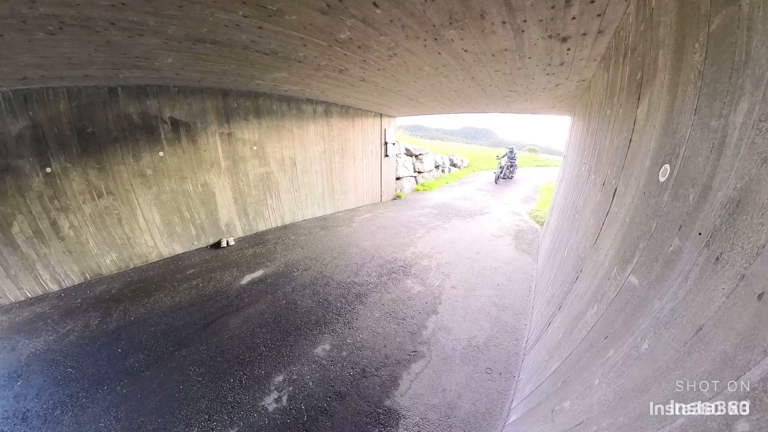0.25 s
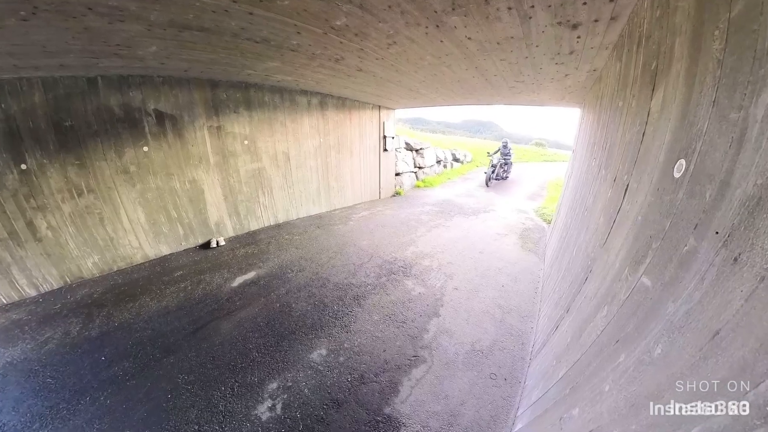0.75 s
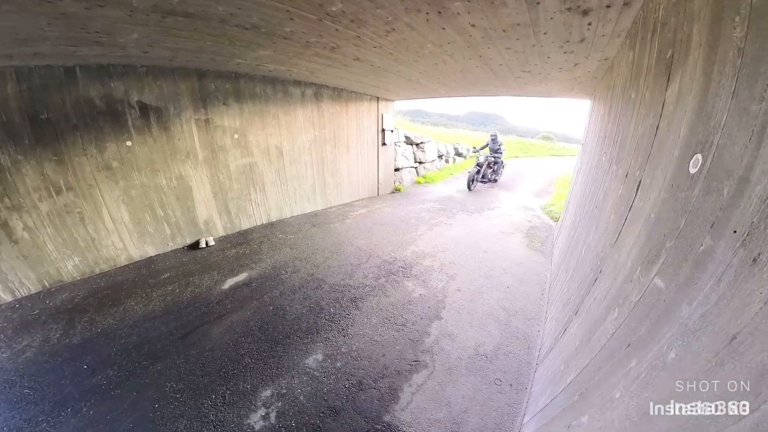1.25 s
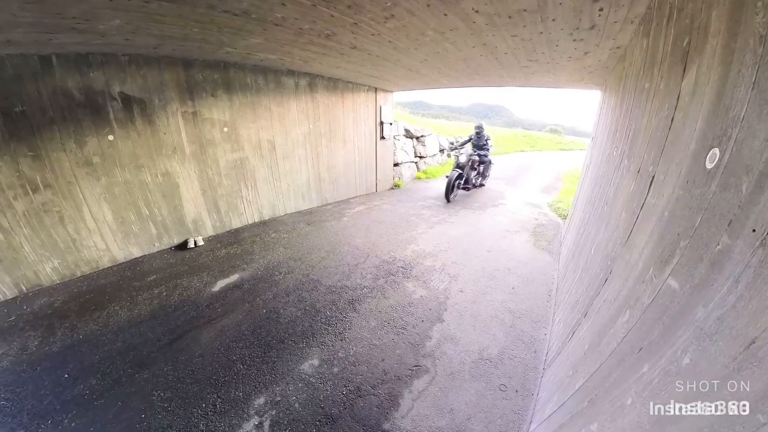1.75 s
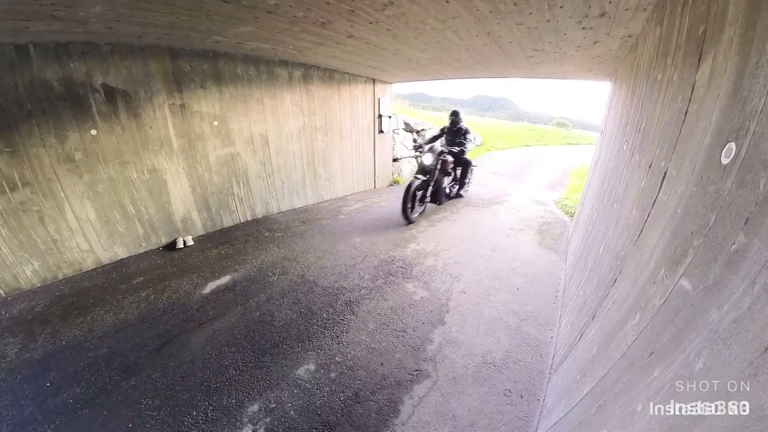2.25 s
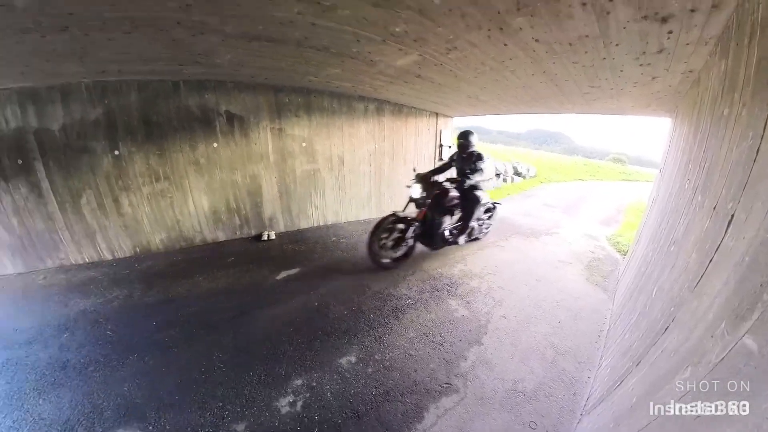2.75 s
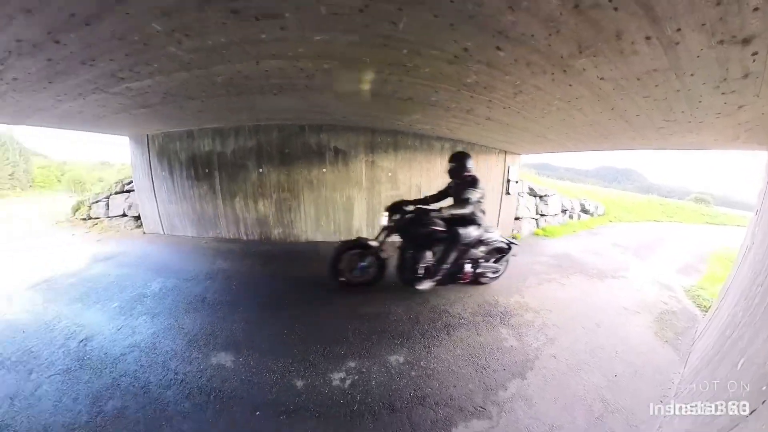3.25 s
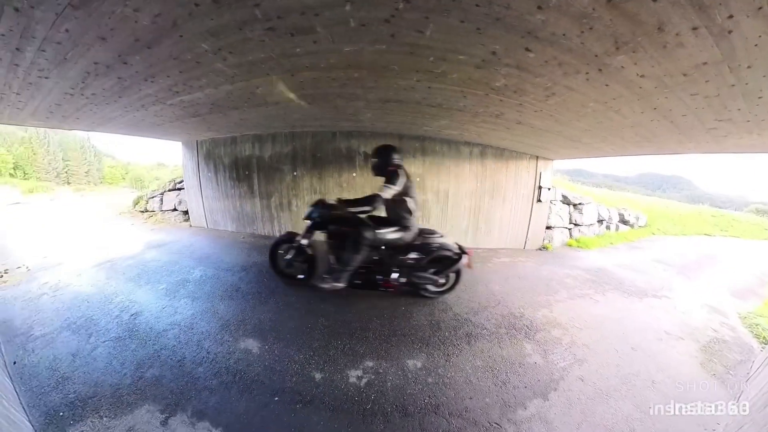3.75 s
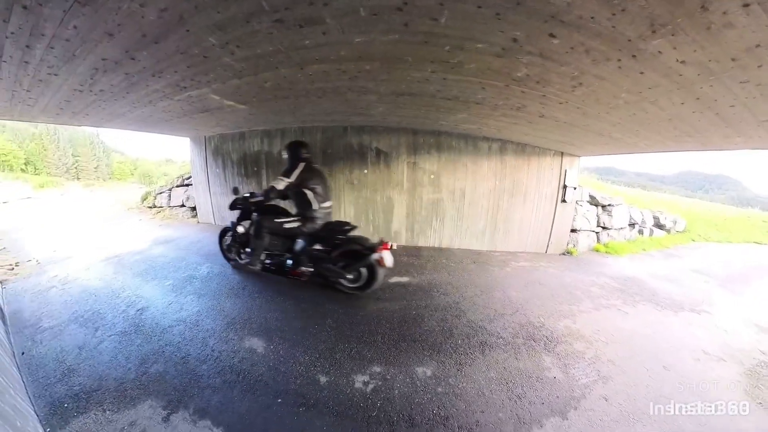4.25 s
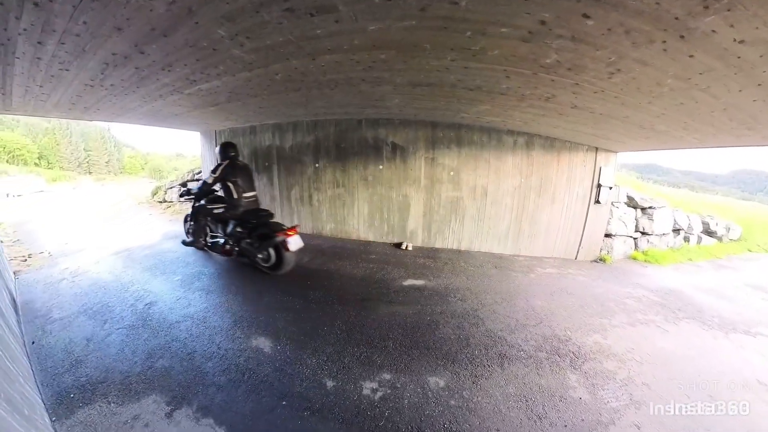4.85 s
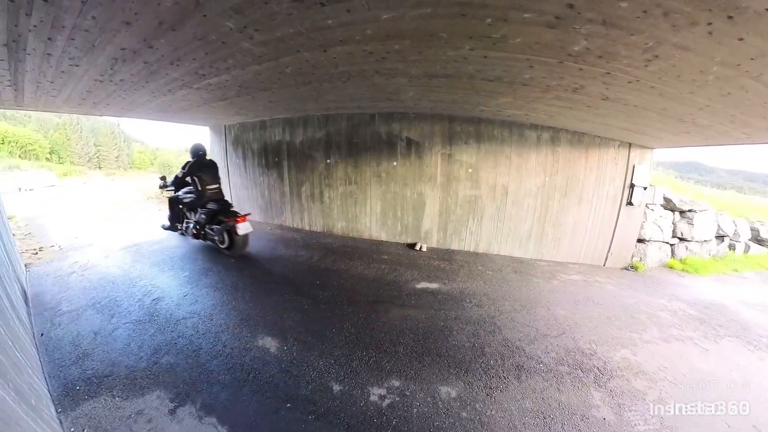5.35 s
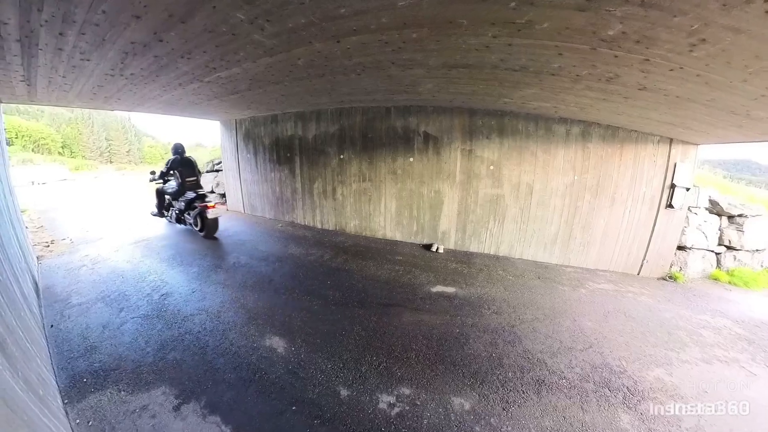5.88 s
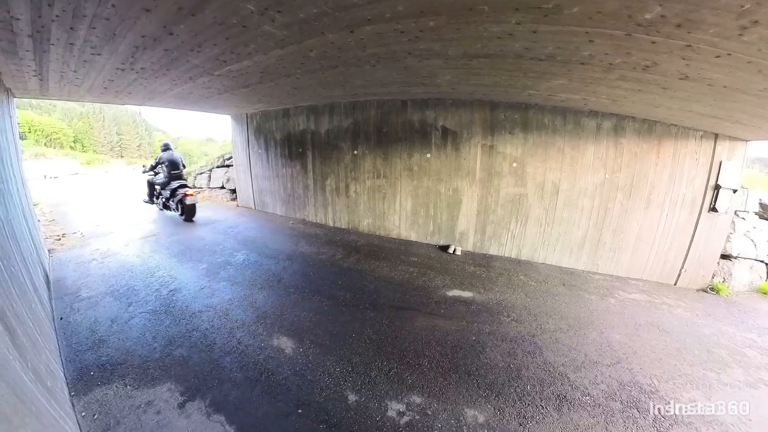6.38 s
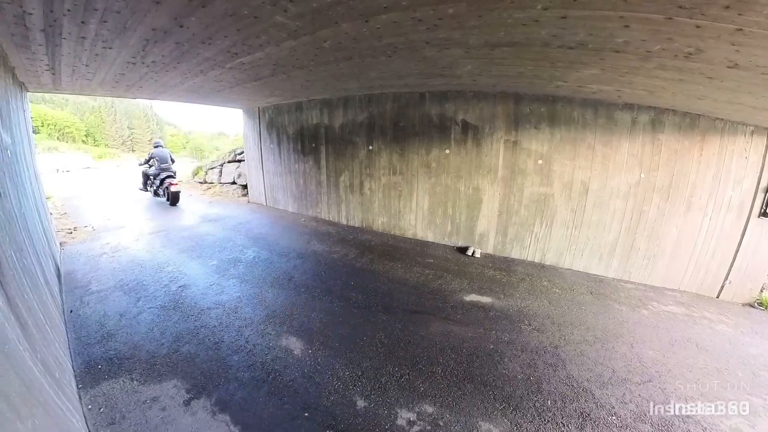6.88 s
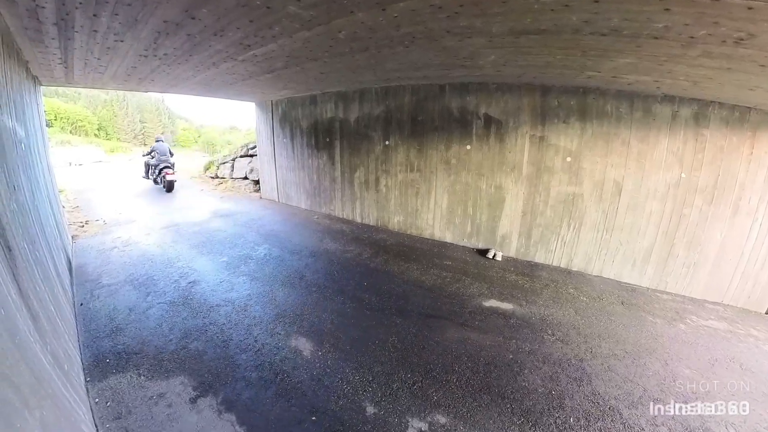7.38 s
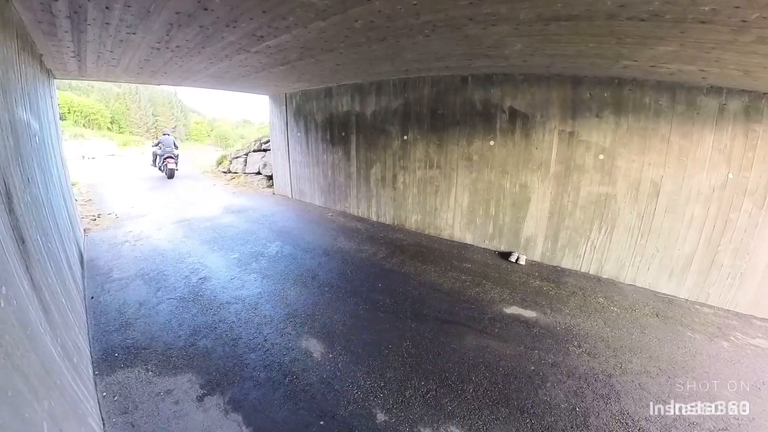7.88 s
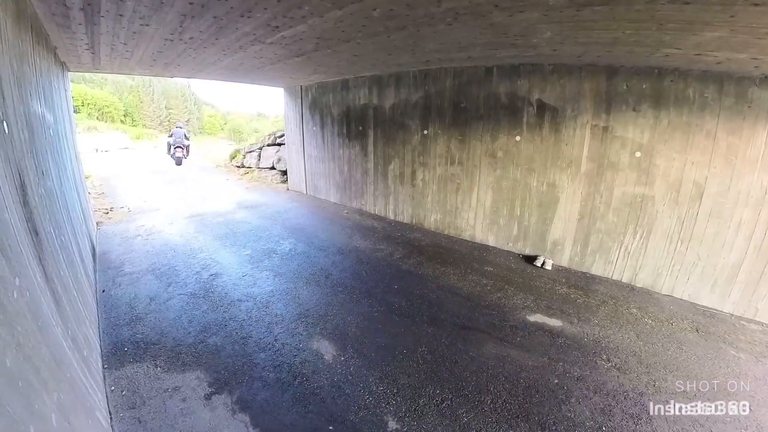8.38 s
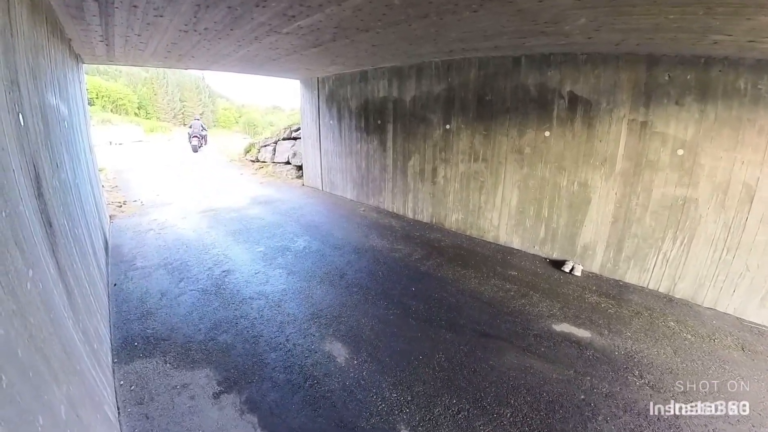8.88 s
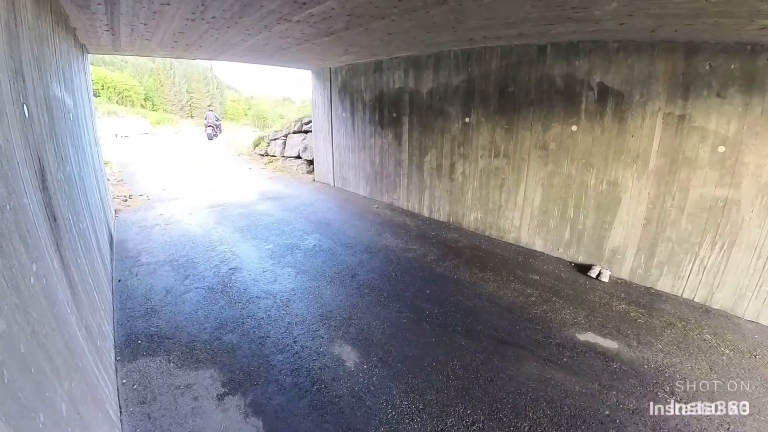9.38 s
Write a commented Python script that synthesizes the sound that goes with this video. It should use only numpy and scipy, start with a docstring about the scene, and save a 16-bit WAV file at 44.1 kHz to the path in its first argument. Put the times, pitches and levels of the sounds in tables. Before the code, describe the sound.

Deep, uneven motorcycle exhaust throbs and echoes in a concrete underpass as the bike rolls past, revs briefly and leaves.

```python
"""A big V-twin motorcycle booms slowly through a concrete underpass, blips the throttle and leaves.
Two uneven firings a cycle drive the pipe: four low booms, a bark and a growl. The motor rasps, ticks
and clanks; a gear whines on the approach; covers ring and rattle. Walls, roof and road smear the
sound and hold low standing waves. A quick gain control flattens the level."""
import sys
import numpy as np
from scipy import signal
from scipy.io import wavfile
from scipy.ndimage import uniform_filter1d

SR = 44100
rng = np.random.default_rng(int(sys.argv[2]) if len(sys.argv) > 2 else 0)


def int16_out(signal):
    """Quantize to a 16-bit WAV file."""
    q = np.round(np.clip(np.atleast_2d(signal).T, -1, 1) * 32767)
    wavfile.write(sys.argv[1], SR, q.astype(np.int16))


N = 424683
TIME_S = np.arange(N) / SR

# Engine speed, two crank turns a cycle: time_s, cycle_hz
ENGINE_SPEED = [(0.0, 11.79), (0.35, 11.74), (0.7, 11.94), (1.2, 11.73), (2.1, 11.0), (2.4, 11.34),
                (3.0, 11.08), (3.3, 11.98), (3.65, 11.61), (4.0, 10.24), (4.5, 8.81), (5.1, 9.16),
                (5.65, 8.87), (6.3, 16.87), (6.63, 14.87), (6.85, 16.14), (7.2, 14.49), (7.45, 14.95),
                (7.8, 11.29), (8.15, 10.95), (9.15, 10.61), (9.4, 11.9), (9.63, 12.2)]
# When the bike is heard from each of three sides: ahead_s, beside_s, behind_s
SIDE_TIMES = (3.0, 5.1, 7.6)

# Exhaust booms, trading places across the standing waves: time_s, 4 x level_db
BOOM_LEVELS = [(0.05, -23, -12.5, -15, -29), (0.69, -20, -13.5, -16.5, -33), (1.4, -15.5, -12, -14.5, -41),
               (2.15, -20.5, -14.5, -11, -25.5), (2.62, -17, -14, -16, -16.5), (2.76, -20, -22, -14, -14),
               (2.97, -21, -23.5, -9, -19), (3.58, -18, -11.5, -20, -18.5), (3.82, -33, -11, -19, -19),
               (4.27, -12.5, -17, -10, -21), (4.48, -22, -14.5, -19, -22.5), (4.59, -19, -20, -5, -19.5),
               (4.67, -20, -9.5, -22, -17), (4.96, -30, -14, -11.5, -23.5), (5.01, -31, -20, -19, -28),
               (5.07, -33, -15, -7, -32), (5.12, -28, -19, -15, -33), (5.2, -40, -21.5, -8, -26),
               (5.34, -34, -19, -7.5, -25), (5.46, -29, -15, -15.5, -24.5), (5.63, -29, -16, -9, -20.5),
               (5.7, -25, -12, -14, -25), (5.76, -22, -15.5, -10.5, -22.5), (5.84, -23, -14.5, -11, -24),
               (5.94, -27, -4, -15.5, -19.5), (5.99, -23, -13, -9, -21), (6.15, -19, -11.5, -15.5, -21),
               (6.79, -33, -11, -18.5, -18.5), (6.981, -27, -13.5, -15, -20.5),
               (8.07, -19, -11.5, -18.5, -22.5), (8.6, -20, -15, -15, -22.5),
               (9.13, -22, -17.5, -15.5, -20.5), (9.3, -19, -16, -17.5, -23.5),
               (9.53, -26, -10.5, -17, -20.5), (9.58, -24, -17, -19.5, -22)]
# Resonance width, a row per boom: ahead_hz, beside_hz, behind_hz
BOOM_WIDTHS = [(30, 30, 26), (33, 46, 23), (56, 54, 27), (80, 95, 48)]
# Pitch of the lowest boom: ahead_hz, beside_hz, behind_hz
LOWEST_BOOM = (56.6, 53.4, 64)
# Firing pattern, a row per boom: 3 sides x (first_cycles, gap_cycles, second_db)
BOOM_FIRINGS = [(.43, .43, -1, .44, .43, -1, .45, .43, 0), (-.07, .44, -4, .2, .44, -2, .45, .4, -4),
                (.1, .42, 0, 0, .445, 0, -.05, .45, -5), (.13, .47, -8, .2, .44, -2, .27, .42, 3)]
# Pitch swing, a row per boom: 3 sides x (depth_ratio, top_cycles)
BOOM_SWINGS = [(0, 0, 0, 0, 0.017, 0), (0.022, -0.028, 0.037, -0.12, 0.15, -0.22),
               (0.079, .2, .02, -0.16, 0.099, -0.03), (0, 0.36, .05, 0.21, 0.0098, 0.8)]
# Pitch swing of the bark: 3 sides x (depth_ratio, top_cycles)
BARK_SWINGS = (0.027, 0.16, 0.037, 0.24, 0.11, 0.48)
# Resonances shifting with the bike's place: time_s, 3 x upper_boom_hz, bark_hz, growl_hz
EXHAUST_PITCHES = [(0, 98, 203.6, 256, 388, 834), (1.2, 99.7, 220.6, 286, 384, 823),
                   (1.6, 88.4, 206, 234, 577, 1180), (2.1, 81.2, 187.5, 259, 480, 1060),
                   (2.8, 89.5, 173, 223, 630, 970), (3.5, 90, 173, 227.5, 512, 783),
                   (4.4, 94, 167, 235, 557, 803), (5.3, 83.5, 149, 266, 543, 806),
                   (6.1, 86.3, 170, 272, 540, 887), (6.7, 87, 173, 264, 505, 930),
                   (7.4, 75, 172, 284, 520, 920), (7.8, 100, 184, 282, 460, 860),
                   (8.9, 102, 178.3, 292, 433, 1120), (9.63, 97.4, 184.6, 269, 397, 1190)]
# Exhaust bark spectrum: freq_hz, gain_db
BARK_SPECTRUM = [(190, -28), (320, -1.5), (361, 2.5), (445, -1), (539, -5), (599, -6.5), (760, -31.5),
                 (990, -32.5), (1670, -120)]
# Exhaust growl spectrum: freq_hz, gain_db
GROWL_SPECTRUM = [(400, -21.5), (680, 6.5), (740, -0.5), (896, -4), (1370, -13.5), (1530, -40),
                  (1700, -59.5), (2210, -41), (3740, -120)]
# Exhaust bark and motor rasp: time_s, bark_db, rasp_db
BARK_RASP_LEVELS = [(0.05, -26.5, -44), (0.42, -29.5, -47.5), (0.69, -29, -46.5), (1.22, -33, -45.5),
                    (1.56, -34, -42), (1.69, -25.5, -41), (2.33, -28, -39.5), (2.41, -22, -38),
                    (3.31, -30.5, -44.5), (3.53, -28, -41), (3.79, -30, -44.5), (4.27, -33, -43.5),
                    (4.77, -25, -38.5), (4.85, -25, -38.5), (5.01, -30, -44), (5.86, -30, -42),
                    (5.97, -23.5, -40.5), (6.2, -24.5, -41), (6.4, -27, -39.5), (6.55, -28.5, -42),
                    (6.75, -26, -40.5), (6.9, -33, -44.5), (7.45, -33, -47), (8.54, -28.5, -47),
                    (9.1, -25.5, -50.5), (9.53, -29, -49), (9.58, -27.5, -51)]
# Balance as the bike passes: time_s, growl_over_rasp_db, clatter_under_rasp_db, tick_share
BALANCE = [(0, 7, 9, 0.3), (1, 10.5, 10, 0.14), (1.6, 4, 9, 0.1), (3.6, 8.5, 9.5, 0), (4.4, 6.5, 10, 0.37),
           (5.5, 10.5, 8, 0.28), (5.87, 11, 5.5, 0.5), (5.96, 15.5, 10, 0.6), (6.15, 12.5, 7, 0.5),
           (7, 12.5, 9, 0), (7.6, 9, 8.5, 0.13), (7.9, 9.5, 2.5, 0.85), (8.7, 8.5, 5, 0.73),
           (9.16, 7.5, 4.5, 0.73), (9.5, 7.5, 13.5, 0)]

# Motor rasp spectrum: freq_hz, gain_db
RASP_SPECTRUM = [(820, 0.5), (1400, -1.5), (1770, -6.5), (2220, -4), (2560, -11.5), (2670, -10.5),
                 (2970, -6.5), (3700, -17), (4810, -31.5), (8140, -120)]
# Motor clatter spectrum: freq_hz, gain_db
CLATTER_SPECTRUM = [(2000, -36), (3400, 1), (4890, -2), (6790, -6.5), (7860, -6.5), (9420, -7.5),
                    (12200, -15.5), (13400, -34.5), (14500, -39)]
# Engine casing modes: pitch_hz, width_hz, gain_db
CASING_MODES = [(750, 230, -5.5), (1100, 230, 0.5), (1400, 130, -11.5), (2120, 160, 5), (2460, 160, 11.5),
                (3120, 69, 9.5), (3800, 200, -4), (4850, 130, 5), (5090, 79, 4), (5630, 90, 9),
                (6350, 190, -1), (7160, 89, 4), (7800, 390, 1), (8950, 160, 1), (9850, 120, 3.5),
                (11000, 120, 8.5)]
# Sharp blows on the casing: start_s, strike_db
CLANKS = [(1.0106, -44), (1.4594, -45), (2.976, -36), (4.7894, -45), (4.8526, -36), (5.5144, -38),
          (5.6765, -50), (5.7862, -35.5), (5.891, -24.5), (5.946, -23.5), (5.983, -25.5), (6.029, -34),
          (6.063, -41), (6.1, -34), (6.2257, -34), (6.4083, -36), (6.625, -39), (7.022, -35.5)]
# Clank spectrum: freq_hz, gain_db
CLANK_SPECTRUM = [(500, -24), (1000, -1), (3300, 1), (5500, -2), (7500, -5), (11000, -12), (14500, -22)]

# Gear whine: time_s, level_db
WHINE_LEVELS = [(0.1, -63), (0.36, -58), (0.68, -44.5), (0.98, -46), (1.1, -50), (1.9, -48.5),
                (2.38, -44.5), (3.03, -48), (3.21, -54), (3.5, -49.5), (4.2, -51)]
# Dull gear knocks: centre_s, level_db
GEAR_KNOCKS = [(1.47, -33.5), (2.98, -34)]
# Gear knock spectrum: freq_hz, gain_db
KNOCK_SPECTRUM = [(500, -12), (1100, 4), (1850, 1), (2600, -11), (5000, -13), (9000, -30)]
# Cover modes heard from ahead: pitch_hz, width_hz, level_db
COVER_MODES = [(3060, 180, -67.5), (4120, 180, -57.5), (7740, 160, -70.5)]
# Cover rattle bands: centre_hz, width_hz
RATTLE_BANDS = [(2120, 360), (2850, 580), (4800, 1400)]
# Cover rattle per band: time_s, 3 x level_db
RATTLE_LEVELS = [(3.9, -73, -63, -73), (4.3, -71, -57.5, -66), (4.9, -64, -59, -65), (5.2, -68, -54, -64),
                 (5.8, -64, -56, -57), (6.0, -58, -48, -62), (6.3, -49, -49, -59), (6.75, -68, -48, -64),
                 (6.9, -59, -70, -66), (7.3, -60, -74, -55), (7.8, -54, -65, -55), (8.3, -56, -65, -66),
                 (9.63, -56, -70, -68)]

# Standing waves between walls, roof and road: pitch_hz, width_hz, gain_db
STANDING_WAVES = [(50.3, 2.5, 3.5), (82.4, 5.2, 4), (162, 14, 13.5), (456.7, 50, 9.5), (606.3, 46, 15)]
# Hold of the underpass on the booms, slight in the open: time_s, echo_share
BOOM_ECHO = [(0, .1), (1.3, .14), (2.0, .35), (2.6, .6), (3.1, .62), (3.6, .66), (4.6, .95), (5.3, .7),
             (6.1, .85), (6.3, .55), (7.5, .52), (8.0, .38), (8.5, .2), (9.63, .14)]
# Effect of the bike's place on the upper layers: time_s, echo_depth_ratio, bark_lag_cycles
PASSAGE = [(0, 0.11, 0.0095), (1.4, 0.57, 0.012), (2.1, 0.9, 0.011), (2.6, 0.8, 0.0093), (3.1, 0.7, 0.015),
           (3.6, 1, 0.03), (4.6, 0.6, 0.041), (5.3, 0.76, 0.06), (6.2, 0.47, 0.073), (7, 0.4, 0.083),
           (7.9, 0.67, 0.087), (8.4, 0.16, 0.071), (9.1, 0.17, 0.11), (9.63, 0, 0.11)]

BARK_CYCLES, TICK_CYCLES, FIRING_GAP_CYCLES = .17, .285, .43
MESHES_PER_CYCLE, KNOCK_WIDTH_S, DETUNE_RATIO = 169, 0.015, 0.028
ECHO_OUTSIDE, ECHO_PER_DEPTH = 0.25, 0.86
BAND_LIMIT_HZ = 14300


def exhaust_booms():
    """Firings and their echoes ring four steep, low resonances."""
    echo = curves(BOOM_ECHO)[0]
    pitches_hz = by_side(LOWEST_BOOM, size=1) + curves(EXHAUST_PITCHES)[:3]
    side_shares = [by_side(row, size=1)[0] for row in np.eye(3)]
    out = np.zeros(N)
    for k, (db, hz, widths_hz) in enumerate(zip(curves(BOOM_LEVELS), pitches_hz, BOOM_WIDTHS)):
        first_cycles, gap_cycles, second_db = by_side(BOOM_FIRINGS[k], size=3)
        clicks = firings(first_cycles, spread_db=1.2, second_db=second_db, gap_cycles=gap_cycles)
        drive = standing_waves(underpass(clicks, echo, t60_s=0.77, drift_hz=0.1963), echo)
        pitch_hz = swung(hz, BOOM_SWINGS[k])
        boom = sum(resonate(drive * share, pitch_hz, width_hz, order=2)
                   for share, width_hz in zip(side_shares, widths_hz))
        out += (-1) ** k * gain_of(db) * steadied(boom)
    return out


def exhaust_bark_and_growl(bark_db, growl_db, echo):
    """Pulses and turbulent flow in the pipe; the growl is mostly flow."""
    bark_hz, growl_hz = curves(EXHAUST_PITCHES)[3:]
    lag_cycles = curves(PASSAGE)[1]
    clicks = firings(BARK_CYCLES + lag_cycles, spread_db=2.46, second_db=-2.0)
    pulses = steadied(clicks)
    flow = steadied(puffs(clicks, decay_s=0.0089, steady=0.43))
    bark = underpass(pulses + 0.5 * flow, echo, t60_s=0.84, drift_hz=0.381)
    bark = coloured(standing_waves(bark, echo), BARK_SPECTRUM)
    bark += 7.6 * resonate(bark, swung(bark_hz, BARK_SWINGS), width_hz=160)
    growl = underpass(0.51 * pulses + flow, echo, t60_s=0.58, drift_hz=0.525)
    growl = coloured(growl, GROWL_SPECTRUM)
    growl += 1.13 * resonate(growl, growl_hz, width_hz=120)
    return gain_of(bark_db) * steadied(bark) + gain_of(growl_db) * steadied(growl)


def firings(first_cycles, spread_db, second_db, gap_cycles=FIRING_GAP_CYCLES):
    """One click per cylinder per cycle, unevenly spaced, varying in strength."""
    cycles = engine_cycles() - first_cycles
    out = np.zeros(N)
    for offset, db in ((0, np.zeros(N)), (gap_cycles, second_db + np.zeros(N))):
        at = np.flatnonzero(np.diff(np.floor(cycles - offset)))
        out[at] = gain_of(db[at] + spread_db * rng.standard_normal(200)[:len(at)])
    return out


def puffs(clicks, decay_s, steady):
    """Turbulent noise: a burst at each click over a steady floor."""
    burst = signal.lfilter([1], [1, -np.exp(-1 / (decay_s * SR))], clicks)
    burst = uniform_filter1d(burst, size=220)  # soft rise
    return (steady + burst) * rng.standard_normal(N)


def motor(rasp_db, clatter_db, tick_share, echo):
    """Rasp and clatter, each a mix of hiss and valve ticks on the casing."""
    clicks = firings(TICK_CYCLES, spread_db=1.2, second_db=-4.0)
    hiss = puffs(clicks, decay_s=0.03, steady=7.2)
    ticks = underpass(casing(clicks, decay_s=0.0048), 0.5 * echo, t60_s=0.13, drift_hz=0.622)
    out = np.zeros(N)
    for db, spectrum, share in ((rasp_db, RASP_SPECTRUM, 0.28 * tick_share),
                                (clatter_db, CLATTER_SPECTRUM, tick_share)):
        steady, struck = steadied(coloured(hiss, spectrum)), steadied(coloured(ticks, spectrum))
        out += gain_of(db) * (np.sqrt(1 - share) * steady + np.sqrt(share) * struck)
    return out


def clanks():
    """Single sharp blows on the casing, with a long echo."""
    blows = np.zeros(N)
    for start_s, db in CLANKS:
        blows[round(start_s * SR)] = gain_of(db)
    ringing = coloured(casing(blows, decay_s=0.0066), CLANK_SPECTRUM)
    return gain_of(6.0) * underpass(ringing, echo=0.62, t60_s=1.0, drift_hz=0.646)


def casing(clicks, decay_s):
    """Noisy strikes ring the casing modes; strength and pitch vary per blow."""
    strike = puffs(clicks, decay_s, steady=0)
    blow = np.cumsum(clicks > 0)
    strength = gain_of(4.5 * np.clip(rng.standard_normal((300, len(CASING_MODES))), -2, 2))
    detune = 1 + DETUNE_RATIO * rng.standard_normal(strength.shape)
    out = 0.07 * np.diff(strike, prepend=0)  # dry tick
    for k, (hz, width_hz, db) in enumerate(CASING_MODES):
        out += gain_of(db) * resonate(strike * strength[blow, k], hz * detune[blow, k], width_hz)
    return out


def gears_and_covers():
    """Dull gear knocks, plus mesh whine and ringing covers that fade as the bike passes."""
    noise = rng.standard_normal(N)
    bumps = sum(gain_of(db) * np.exp(-((TIME_S - s) / KNOCK_WIDTH_S) ** 2) for s, db in GEAR_KNOCKS)
    knocks = bumps * steadied(coloured(noise, KNOCK_SPECTRUM))
    mesh_hz = MESHES_PER_CYCLE * curves(ENGINE_SPEED)[0]
    throb = 1 + .5 * np.cos(8 * np.pi * engine_cycles())  # twice a crank turn
    whine = throb * gain_of(curves(WHINE_LEVELS)[0]) * steadied(resonate(noise, mesh_hz, width_hz=36))
    waver_db = 1.8 * steadied(uniform_filter1d(rng.standard_normal(N), size=SR // 8), size=SR)
    covers = sum(gain_of(db) * steadied(mode(noise, hz, width_hz)) for hz, width_hz, db in COVER_MODES)
    approach = np.interp(TIME_S, [3.9, 4.3], [1, 0])
    return knocks + approach * (whine + gain_of(waver_db) * covers)


def cover_rattle():
    """Covers rattle at each firing, heard mostly from beside and behind."""
    clicks = firings(TICK_CYCLES, spread_db=4.0, second_db=-2.5)
    rattle = puffs(clicks, decay_s=0.019, steady=0.41)
    return sum(gain_of(db) * steadied(mode(mode(rattle, *band), *band))
               for db, band in zip(curves(RATTLE_LEVELS), RATTLE_BANDS))


def underpass(x, echo, t60_s, drift_hz):
    """Direct sound plus three sparse echo tails that crossfade as the bike moves."""
    tail_s, wet = np.arange(SR // 3) / SR, np.zeros(N)
    for k in range(3):
        reflections = rng.standard_normal(len(tail_s)) * (rng.random(len(tail_s)) < .05)
        tail = reflections * gain_of(-60 * tail_s / t60_s) * (tail_s > .006)
        crossfade = np.cos(np.pi * (drift_hz * TIME_S + k / 3)) * np.sqrt(2 / 3)
        wet += signal.oaconvolve(x * crossfade, tail / np.linalg.norm(tail))[:N]
    echo = np.clip(echo, 0, 1)
    return np.sqrt(1 - echo) * x + np.sqrt(echo) * wet


def standing_waves(x, echo):
    """The air in the underpass rings at its own pitches."""
    inside = np.clip(echo, 0, 1) ** 2.6
    return x + sum(gain_of(db) * mode(x * inside, hz, width_hz) for hz, width_hz, db in STANDING_WAVES)


def engine_cycles():
    """Cycles elapsed at each sample."""
    return np.cumsum(curves(ENGINE_SPEED)[0]) / SR


def swung(hz, swing):
    """Pitch rising and falling once an engine cycle."""
    depth, top_cycles = by_side(swing, size=2)
    return hz * (1 + depth * np.cos(2 * np.pi * (engine_cycles() - top_cycles)))


def by_side(row, size):
    """Blend of ahead, beside and behind, with size values per side."""
    return [np.interp(TIME_S, SIDE_TIMES, row[c::size]) for c in range(size)]


def curves(rows):
    """Columns after time_s, interpolated per sample."""
    times_s, *columns = np.transpose(rows)
    return [np.interp(TIME_S, times_s, column) for column in columns]


def gain_of(db):
    return 10 ** (np.asarray(db) / 20)


def steadied(x, size=SR // 3):
    """Slow rms level divided out."""
    power = uniform_filter1d(uniform_filter1d(x ** 2, size), size // 2)
    return x / np.sqrt(abs(power) + 1e-20)


def coloured(x, spectrum, size=8192):
    """Minimum-phase filter with the given spectrum."""
    points_hz, points_db = np.transpose(spectrum)
    hz = np.abs(np.fft.fftfreq(size, 1 / SR))
    db = np.interp(np.log(hz + 1), np.log(points_hz), points_db, left=-90, right=-90)
    response = np.exp(np.conj(signal.hilbert(np.log(gain_of(db)))))
    return signal.oaconvolve(x, np.fft.ifft(response).real[:size // 2])[:N]


def resonate(x, hz, width_hz, order=1):
    """Gliding resonance: shift hz to zero, low-pass, shift back."""
    carrier = np.exp(2j * np.pi * np.cumsum(hz * np.ones(N)) / SR)
    pole = np.exp(-np.pi * width_hz / SR)
    baseband = x * np.conj(carrier)
    for _ in range(order):
        baseband = signal.lfilter([1 - pole], [1, -pole], baseband)
    return 2 * (carrier * baseband).real


def mode(x, hz, width_hz):
    """Stationary resonance, unity peak gain."""
    return signal.lfilter(*signal.iirpeak(hz, hz / width_hz, SR), x)


def scene():
    """The motorcycle heard from inside the underpass, mono."""
    bark_db, rasp_db = curves(BARK_RASP_LEVELS)
    growl_over_db, clatter_under_db, tick_share = curves(BALANCE)
    echo = ECHO_OUTSIDE + ECHO_PER_DEPTH * curves(PASSAGE)[0]
    pipe = exhaust_booms() + exhaust_bark_and_growl(bark_db, rasp_db + growl_over_db, echo)
    engine = motor(rasp_db, rasp_db - clatter_under_db, tick_share, echo) + clanks()
    return (pipe + engine + gears_and_covers() + cover_rattle())[None]


def record(dry):
    """Bass cut, quick gain control on the loudest booms, soft clip, band limit."""
    x = signal.sosfilt(signal.butter(6, 42, "high", fs=SR, output="sos"), dry)
    power_db = 10 * np.log10(abs(uniform_filter1d(x ** 2, 1500)) + 1e-12)
    reduction_db = 0.22 * np.maximum(power_db + 16.5, 0)
    x = np.tanh(0.79 * x / gain_of(reduction_db)) / 0.71
    lowpass = signal.firwin(511, BAND_LIMIT_HZ, window=("kaiser", 9), fs=SR)
    return signal.oaconvolve(x, lowpass[None], "same")


dry = scene()
out = record(dry)
int16_out(out)
```